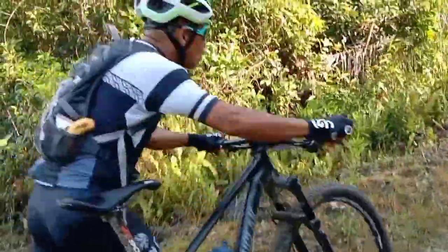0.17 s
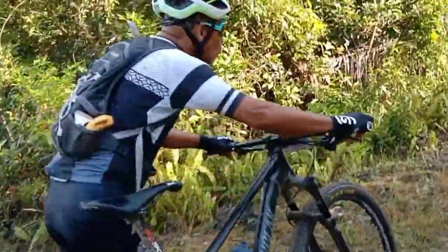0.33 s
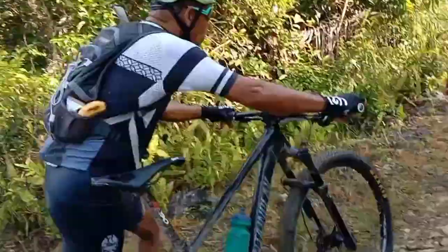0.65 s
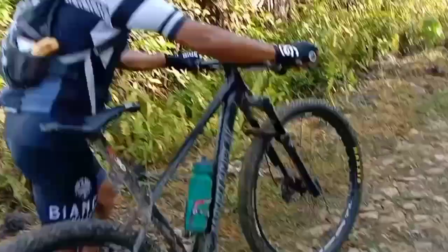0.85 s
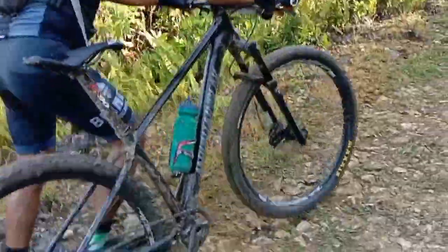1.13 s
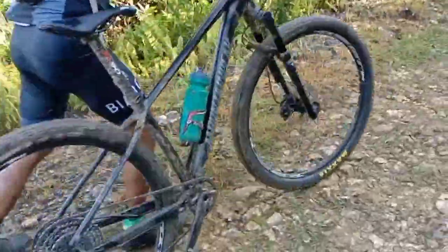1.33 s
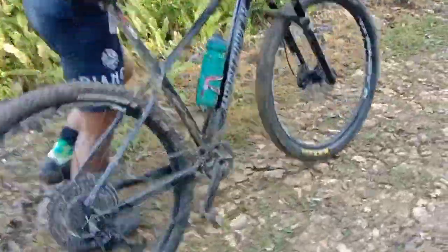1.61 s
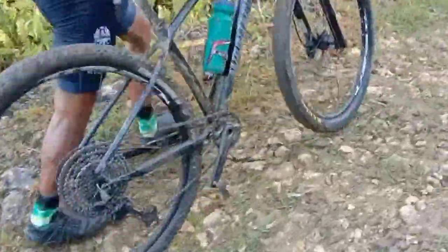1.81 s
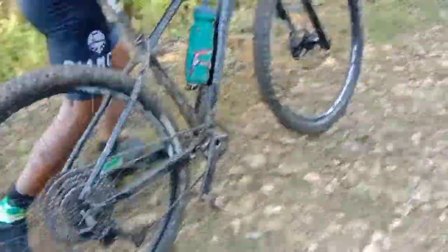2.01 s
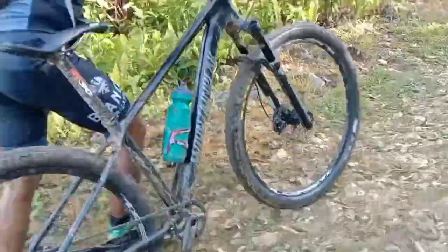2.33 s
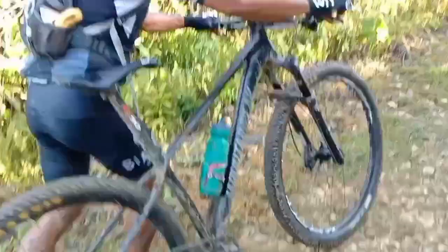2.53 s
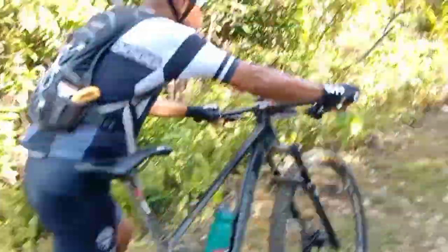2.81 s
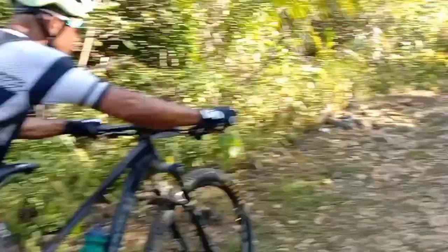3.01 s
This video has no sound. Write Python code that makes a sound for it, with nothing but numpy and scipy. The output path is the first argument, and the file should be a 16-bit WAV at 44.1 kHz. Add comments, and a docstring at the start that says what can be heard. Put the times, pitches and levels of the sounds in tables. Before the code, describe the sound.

Rapid metallic ticking of a wheeled bicycle's freewheel, with stones knocking and grit crunching.

```python
"""Insects hiss in the bushes and grit crunches as a ticking mountain bike is pushed along a stony trail.
The freewheel pawl snaps about thirteen times a second and rings the hub and sprockets; the chain
rattles lightly between snaps. Tyres and shoes knock loose stones together and thud on the ground."""
import sys
import numpy as np
from scipy import signal
from scipy.fft import rfft, irfft
from scipy.io import wavfile

SR = 44100
rng = np.random.default_rng(int(sys.argv[2]) if len(sys.argv) > 2 else 0)


def dump(signal):
    """Clip the signal to [-1, 1] and save it as 16-bit WAV at the path in sys.argv[1]."""
    limited = np.clip(np.atleast_2d(signal).T, -1, 1)
    pcm = np.round(limited * 32767).astype(np.int16)
    wavfile.write(sys.argv[1], SR, pcm)


N = 138915
EVENT_T = np.arange(SR // 5) / SR   # time axis of one hit, s


def amp(db):
    """Decibels to gain."""
    return 10 ** (np.asarray(db) / 20)


def unit(x):
    """Scale to rms 1."""
    return x / np.sqrt(np.mean(x ** 2) + 1e-20)


def decay(t, t60):
    """Full until time zero, then 60 dB down every t60."""
    return np.exp(-np.log(1000) * np.maximum(t, 0) / t60)


def noise(colour, size):
    """Noise of rms 1, shaped by rows of f/Hz, relative level/dB."""
    hz, db = np.transpose(colour)
    f = np.maximum(np.fft.rfftfreq(size, 1 / SR), 1)
    gain = amp(np.interp(np.log(f), np.log(hz), db))
    return unit(irfft(rfft(rng.standard_normal(size)) * gain, size))


def wander():
    """Random modulation of rms 1, mostly below 15 Hz."""
    return noise([(1, 0), (15, 0), (60, -30), (500, -90)], N)


def band(x, low_hz, high_hz):
    """Band-pass with a steep top."""
    x = signal.sosfilt(signal.butter(2, low_hz, "high", fs=SR, output="sos"), x)
    return signal.sosfilt(signal.butter(4, min(high_hz, SR / 3), fs=SR, output="sos"), x)


def strike(modes, scatter_db, detune):
    """Struck modes; every blow gives each its own strength, tuning and sign."""
    hz, db, t60 = np.transpose(modes)[:, :, None]
    strength, shift, sign = rng.standard_normal((3, len(modes), 1))
    waves = np.sin(2 * np.pi * hz * (1 + detune * shift) * EVENT_T) * decay(EVENT_T, t60)
    return np.sum(np.sign(sign) * amp(db + scatter_db * strength) * waves, axis=0)


def add(out, at_s, sound):
    """Mix a sound in at the given time."""
    start = int(at_s * SR)
    sound = sound[max(-start, 0):]
    start = max(start, 0)
    out[start:start + len(sound)] += sound[:max(N - start, 0)]


# colours of the open air and the insect chorus: f/Hz, relative level/dB
AIR_COLOUR = [(25,-26),(50,-53),(90,8),(150,1.5),(300,5),(700,-10.5),(1600,-1),(2500,-34.5),(4300,-37),(6000,-28.5),(10000,-0.5),(15000,2.5)]
CHORUS_COLOUR = [(4600,-26.5),(5050,-3),(5350,-11),(5650,10.5),(5950,-23),(6500,-16),(7450,5.5),(7850,4.5),(8150,-2.5),(10000,-12),(15000,-2)]
# nearer insects: f/Hz, rms level/dB
NEAR_INSECTS = [(5750,-73.5),(7640,-59),(7820,-60)]
def bushes():
    """A bed of still air, a softly throbbing insect chorus and a few wavering shrills nearer by."""
    throb_db, waver_hz, swing_db = 4.9, 29.8, 7
    out = amp(-60) * noise(AIR_COLOUR, N)
    out += amp(-51.5 + throb_db * wander()) * noise(CHORUS_COLOUR, N)
    for hz, db in NEAR_INSECTS:
        phase = 2 * np.pi * np.cumsum(hz + waver_hz * wander()) / SR
        out += amp(db) * unit(amp(swing_db * wander()) * np.sin(phase))
    return out


# swells of the crunch: t/s, level/dB
GRIT_SWELLS = [(0,-46.5),(.25,-46),(.62,-41),(.82,-48.5),(1.25,-44),(1.48,-50.5),(1.62,-42),(1.82,-50),(2.0,-42),(2.28,-54.5),(2.52,-42),(2.78,-59.5),(2.95,-46),(3.15,-45.5)]
# colour of the crunch: f/Hz, relative level/dB
GRIT_COLOUR = [(200,-1.5),(700,-8),(1400,2.5),(2500,-7),(4300,-13),(5500,6),(7000,14),(9000,3),(12000,-0.5),(15000,6.5)]
def grit():
    """Tiny grains crack at random under the rolling tyres, each a short burst of noise."""
    grains_per_s, spread_db, grain_t60 = 410, 2.5, 0.029
    onsets = rng.random(N) < grains_per_s / SR
    grains = onsets * amp(spread_db * np.minimum(rng.exponential(1, N), 4))
    power = signal.lfilter([1], [1, -decay(1 / SR, grain_t60) ** 2], grains ** 2 + 1e-18)
    crunch = unit(np.sqrt(power) * noise(GRIT_COLOUR, N))
    times, db = np.transpose(GRIT_SWELLS)
    return amp(np.interp(np.arange(N) / SR, times, db)) * crunch


# colour of the snap's crowd of short-lived modes: f/Hz, relative level/dB
SNAP_COLOUR = [(900,-33.5),(2500,-26),(3700,-14.5),(4400,-25),(5300,-4.5),(7000,3.5),(8200,-1.5),(9500,1),(10600,-4.5),(11600,2),(12700,1),(14000,5.5),(15300,3.5),(16000,-1)]
# clear modes of the hub: f/Hz, relative level/dB, t60/s
HUB_MODES = [(5520,-6,.05),(6290,-11,.04),(6990,-4,.04),(9500,0,.037),(9620,-2,.037),(11200,-5,.05),(13800,-4,.025),(14000,-1,.037),(14750,-6,.022)]
def snap():
    """Steel hits steel in the hub: a brief chatter and a clear ping, a shade darker or brighter each hit."""
    attack_s, hold_s, t60 = 0.00037, 0.0014, 0.031
    envelope = np.minimum(EVENT_T / attack_s, 1) * decay(EVENT_T - hold_s, t60)
    chatter = amp(5.5) * envelope * noise(SNAP_COLOUR, len(EVENT_T))
    hit = chatter + amp(-1) * strike(HUB_MODES, scatter_db=1.5, detune=0.0051)
    body = signal.sosfilt(signal.butter(1, 6800, fs=SR, output="sos"), hit)
    shelf_db = rng.uniform(-0.29, 0.5)
    return hit + (amp(shelf_db) - 1) * body


# colour of the cassette's metallic wash: f/Hz, relative level/dB
WASH_COLOUR = [(1000,-15.5),(2300,-0.5),(3500,-8),(4400,-15),(5400,4),(7000,7.5),(8500,-4),(12000,1),(15000,-23.5)]
# modes of the sprockets: f/Hz, relative level/dB, t60/s
SPROCKET_MODES = [(2246,-12.5,0.19),(2750,-10.5,0.086),(3110,-12,0.064),(3324,-5,0.033),(3750,-10.5,0.089),(4980,-3.5,0.072),(5400,-9.5,0.13),(5800,-5.5,0.067)]
def cassette():
    """A hit spreads through the sprockets and rings on; the chain drops back on them once."""
    swell = np.minimum(EVENT_T / 0.0042, 1)
    wash = amp(7) * decay(EVENT_T, t60=0.13) * noise(WASH_COLOUR, len(EVENT_T))
    ring = strike(SPROCKET_MODES, scatter_db=7, detune=0.01794)
    delay = int(SR * rng.uniform(0.008, 0.024))
    bounce = amp(-5.5) * strike(SPROCKET_MODES, scatter_db=6.5, detune=0.0308)
    return swell * (wash + ring) + np.pad(bounce, (delay, 0))[:len(EVENT_T)]


# pawl ticks: t/s, snap level/dB, cassette level/dB, sprocket f/Hz, sprocket level/dB before its boost
PAWL_TICKS = [(0.0269, -34.5, -43, 2740, -69), (0.1059, -29.5, -42, 2110, -55.5),
              (0.1762, -33, -48.5, 3750, -56), (0.2506, -34.5, -39.5, 2190, -46.5),
              (0.318, -32.5, -43, 2860, -53.5), (0.39, -31, -43, 2405, -61),
              (0.4511, -30.5, -44.5, 2650, -55), (0.5065, -33, -45.5, 2226, -52),
              (0.5626, -32, -45, 2220, -56), (0.6285, -35, -44, 2286, -52.5),
              (0.6974, -32, -50.5, 2634, -54), (0.773, -30.5, -49.5, 2210, -50.5),
              (0.8464, -32.5, -45, 2272, -57), (0.929, -32, -44, 3020, -55.5),
              (1.0221, -31.5, -48.5, 2210, -55), (1.1176, -32.5, -56, 2650, -53.5),
              (1.1975, -32, -44.5, 2243, -59.5), (1.2835, -29, -54.5, 2650, -67),
              (1.3606, -31, -51.5, 2660, -60), (1.4284, -28.5, -47, 2250, -51.5),
              (1.4996, -29, -44, 2590, -61), (1.5744, -33.5, -41, 2250, -62),
              (1.6526, -27.5, -44.5, 2940, -61), (1.7383, -31, -47.5, 2200, -67),
              (1.8245, -29.5, -47.5, 2255, -59), (1.9107, -29, -46, 2130, -72),
              (1.9947, -29, -47, 2700, -58), (2.0779, -30.5, -42.5, 2700, -50),
              (2.1674, -31.5, -44, 2610, -55.5), (2.2682, -32.5, -46.5, 2193, -59),
              (2.3601, -34.5, -44.5, 3160, -53.5), (2.4481, -34, -47, 2217, -60),
              (2.5223, -30.5, -44, 2190, -78), (2.5941, -31, -45, 2380, -62),
              (2.6604, -31.5, -42.5, 2273, -49), (2.735, -32.5, -43, 2920, -59),
              (2.818, -33, -45.5, 2295, -52), (2.9025, -33.5, -45.5, 2400, -71),
              (2.9906, -34, -41, 2280, -55.5), (3.0821, -32.5, -47.5, 3000, -54.5)]
def freewheel():
    """The pawl slides off a tooth and snaps into the next; the cassette rings and one sprocket sings out."""
    slide_s, tone_rise_s, boost_db = 0.0037, 0.0041, 13.5
    out, t = np.zeros(N), EVENT_T
    for at_s, snap_db, ring_db, tone_hz, tone_db in PAWL_TICKS:
        slide = (t / slide_s) * (t < slide_s) * noise(SNAP_COLOUR, len(t))
        tone = np.sin(2 * np.pi * tone_hz * t) * np.minimum(t / tone_rise_s, 1) * decay(t, t60=0.085)
        add(out, at_s - slide_s, amp(snap_db - 9.5) * slide)
        add(out, at_s, amp(snap_db) * snap() + amp(ring_db) * cassette() + amp(tone_db + boost_db) * tone)
    return out


# chain rattles: t/s, relative level/dB
CHAIN_TOUCHES = [(0.067,-45.5),(0.135,-40.5),(.198,-36.5),(.212,-44),(.264,-37),(.3,-39),(.359,-70),(0.478,-48),(0.541,-47),(.589,-39.5),(.604,-39.5),(0.645,-45),(.753,-40.5),(0.874,-43),
                 (1.05,-35),(1.075,-60),(1.145,-50),(1.176,-66),(1.229,-56),(1.263,-61),(1.404,-45),(1.514,-62),(1.604,-42),(1.634,-47),(1.689,-43.5),(1.773,-43),(1.867,-43),
                 (1.964,-36.5),(2.065,-40),(2.107,-45),(2.191,-41.5),(2.34,-47.5),(2.425,-54),(2.638,-43),(2.752,-38),(2.862,-40),(2.882,-49),(2.96,-39.5),(3.106,-41)]
def chain():
    """The chain touches the sprockets: lighter clinks between the ticks."""
    out = np.zeros(N)
    for at_s, db in CHAIN_TOUCHES:
        add(out, at_s, amp(db) * (amp(-5.5) * snap() + amp(-8) * cassette()))
    return out


# stone hits: t/s, level/dB, lower f/Hz, upper f/Hz, t60/s, brightness f/Hz, scrape level/dB re the hit
STONE_KNOCKS = [(0.2008,-11,708,1179,0.041,1470,-18.5),(0.2053,-15.5,525,956,0.048,1430,-26),(0.307,-33,1252,1320,0.077,1900,-12.5),(.4465,-30.5,262,615,0.038,1190,-12.5),(.544,-46,400,760,.015,1460,-2.5),
                (0.7327,-4.5,516,1023,0.017,1200,-24),(0.7389,-23.5,423,520,0.041,1840,-19.5),(0.9758,-34.5,318,610,0.0053,1850,-14),(.993,-32,1325,1627,0.049,2200,-30),(1.1759,-36,1180,1670,0.011,4000,-8.5),(1.361,-33,276,480,0.013,910,-20),
                (1.412,-35,260,490,0.014,886,-15.5),(1.602,-31.5,3300,4870,0.026,6060,-11),(1.655,-40,1470,1540,0.06,3500,-8),(1.851,-35.5,350,653,0.0067,1400,-18),
                (1.9318,-2.5,1170,1390,0.0061,6400,-16.5),(1.9337,-19,657,1850,0.034,6200,-5.5),(1.94,-20.5,723,1310,0.037,2480,-16),(1.9646,-24.5,594,1130,0.017,3070,-16.5),
                (2.055,-41,442,660,.02,1410,-18),(2.1973,-31,1214,1337,0.063,2260,-22),(2.21,-26.5,1273,1433,0.04,2630,-24),(2.43,-32.5,512,595,0.042,1090,-17),(2.5071,-34.5,1740,1800,0.064,2360,-10.5),
                (2.8597,-36,1283,1319,0.15,1890,-12.5),(2.9342,-25,2480,3260,0.03,3660,-18),(2.976,-42,570,1130,0.037,2070,0.5),(2.988,-29.5,580,1050,.03,2050,-11.5)]
# modes of the wheel, answering each knock: f/Hz, relative level/dB, t60/s
WHEEL_MODES = [(303,-30,.09),(516,-31,.07),(690,-32,.06),(1294,-30,.07),(1422,-32,.06),(1540,-34,.055),(1878,-35,.05),(2415,-34,.045),(2850,-30,.028),(3410,-30,.028),(4750,-29,.02),(5300,-29,.02)]
# notches that hollow out the knocks: f/Hz, Q
STONE_NOTCHES = [(355,4.3),(880,6.3)]
def stones():
    """A stone scuffs, tips, cracks on another with two short tones, scrapes and settles; the wheel rings."""
    hard_hz, rub_top_hz = 5940, 2200
    out, t = np.zeros(N), EVENT_T
    for at_s, db, lower_hz, upper_hz, t60, bright_hz, scrape_db in STONE_KNOCKS:
        floor_hz = 0.72 * min(lower_hz, 900)   # a stone radiates little below this
        pair = (np.sin(2 * np.pi * lower_hz * t) + np.sin(2 * np.pi * upper_hz * t)) / 2
        tones = band(pair * decay(t, t60), floor_hz, 1.28 * bright_hz)
        click = band(signal.unit_impulse(len(t), 4), floor_hz, bright_hz)
        crack = amp(-6) * (bright_hz / hard_hz) * click / abs(click).max()   # duller contacts crack less
        wheel = band(strike(WHEEL_MODES, scatter_db=1.2, detune=0.002), 240, bright_hz)
        add(out, at_s, -amp(db) * (tones + crack + wheel))

        friction = unit(band(rng.standard_normal((3, len(t))), floor_hz, bright_hz))
        scuff, scrape, settle = amp(db + scrape_db) * friction
        scuff = amp(-5) * decay(t[::-1], t60=0.046) * band(scuff, 200, rub_top_hz)   # swells into the hit
        scrape = decay(t, t60=0.034) * scrape
        settle = amp(-3.5) * decay(t, t60=0.12) * band(settle, 280, rub_top_hz)
        rub = np.concatenate([scuff, scrape + settle])
        add(out, at_s - t[-1], band(rub, 205, SR / 3))
    for hz, q in STONE_NOTCHES:
        out = signal.lfilter(*signal.iirnotch(hz, q, fs=SR), out)
    return out


# landings on the ground: t/s, level/dB
LANDINGS = [(.2,-47),(.307,-43),(0.446,-44),(0.734,-34.5),(1.176,-50.5),(1.93,-47),(2.433,-45),(2.866,-48),(2.883,-51.5),(2.977,-51)]
# low modes of the earth: f/Hz, relative level/dB, t60/s
EARTH_MODES = [(99,-3.5,0.062),(140,-8,0.067),(250,4.5,0.026)]
def thuds():
    """A tyre or shoe pushes into the earth: a dull thump with a soft attack."""
    out = np.zeros(N)
    attack = np.minimum(EVENT_T / 0.0034, 1)
    for at_s, db in LANDINGS:
        thump = attack * strike(EARTH_MODES, scatter_db=1.2, detune=0.05)
        add(out, at_s, amp(db) * band(thump, 82, 434))
    return out


def scene():
    """Bike and trail up close over the insect bed, mono, in the open air."""
    return (freewheel() + chain() + stones() + thuds() + grit() + bushes())[None]


def record(dry):
    """A small microphone: no deep bass, and the top is cut."""
    thin = signal.sosfilt(signal.butter(2, 65, "high", fs=SR, output="sos"), dry)
    return signal.sosfilt(signal.ellip(10, 0.2, 70, 15500, fs=SR, output="sos"), thin)


dry = scene()
out = record(dry)
dump(out)
```